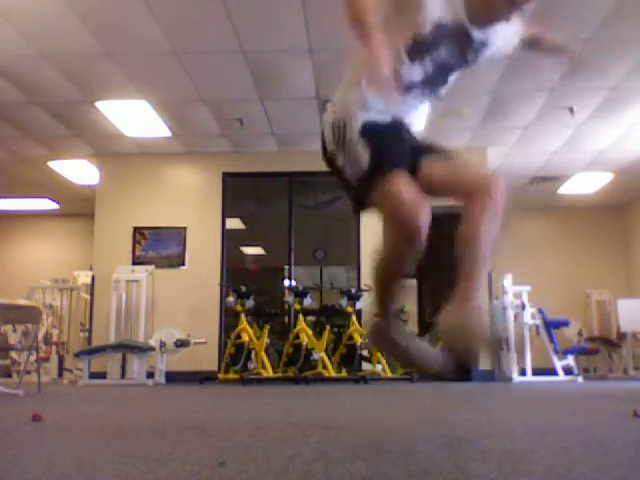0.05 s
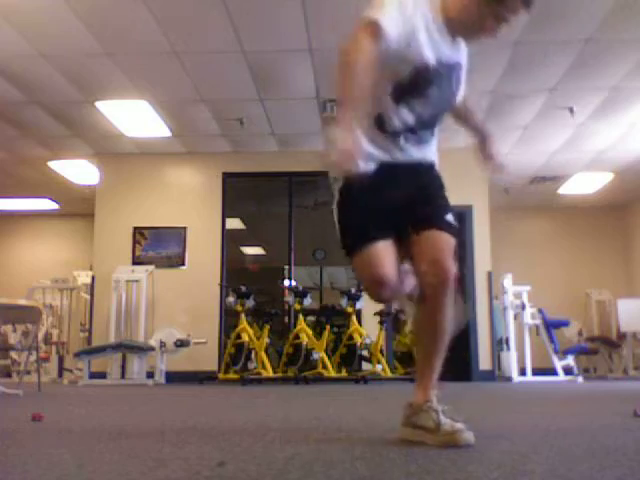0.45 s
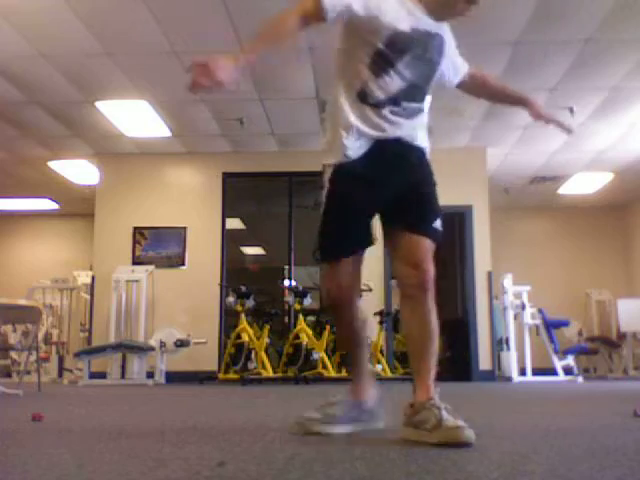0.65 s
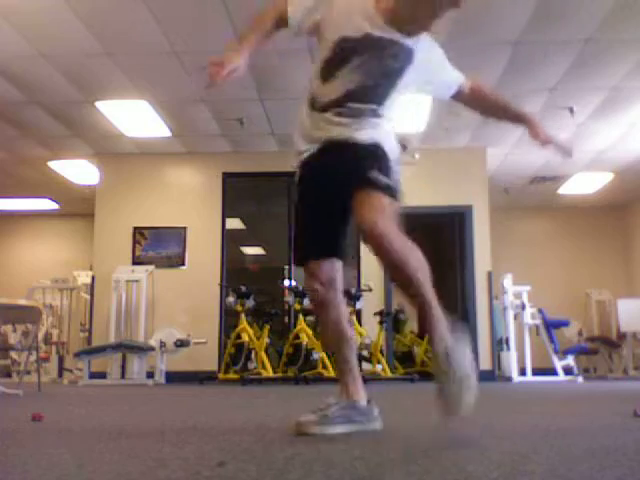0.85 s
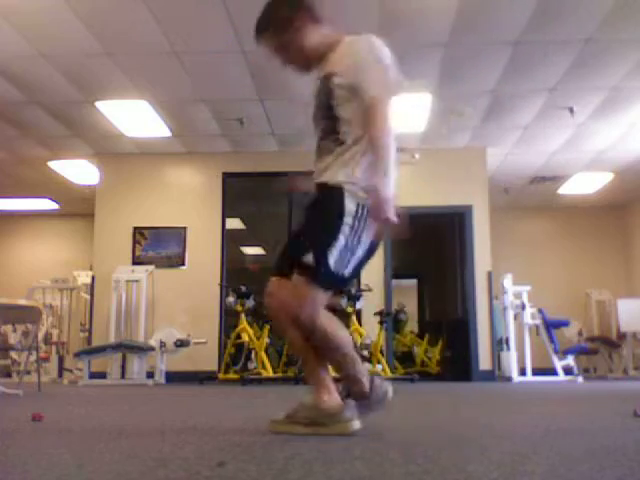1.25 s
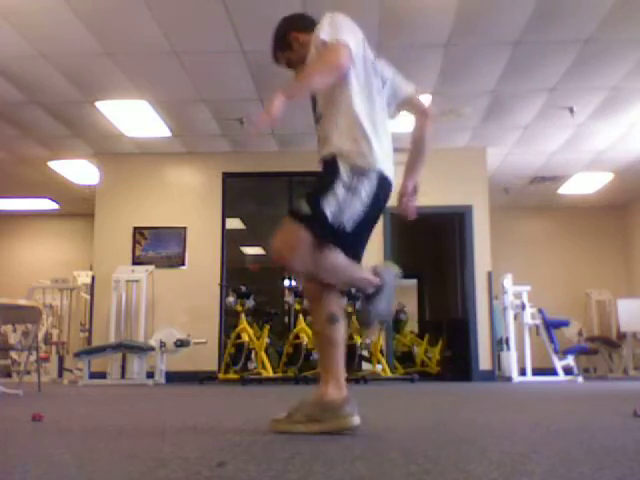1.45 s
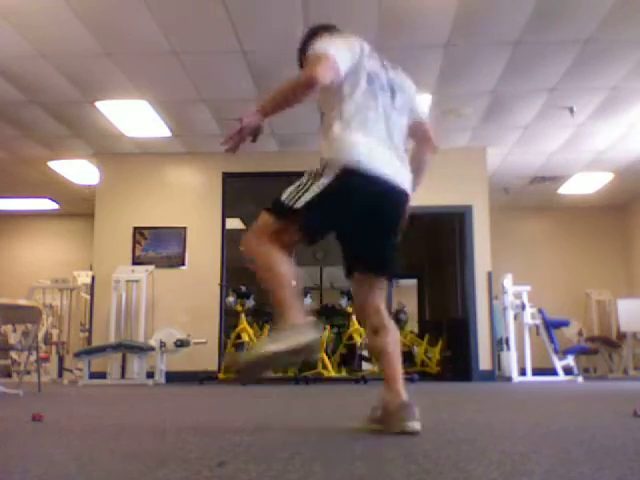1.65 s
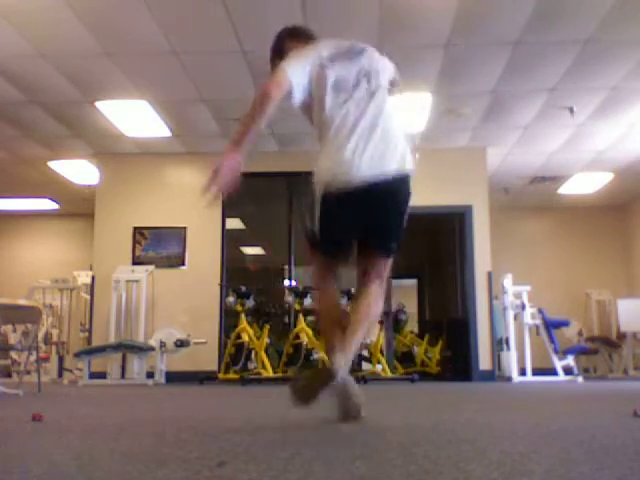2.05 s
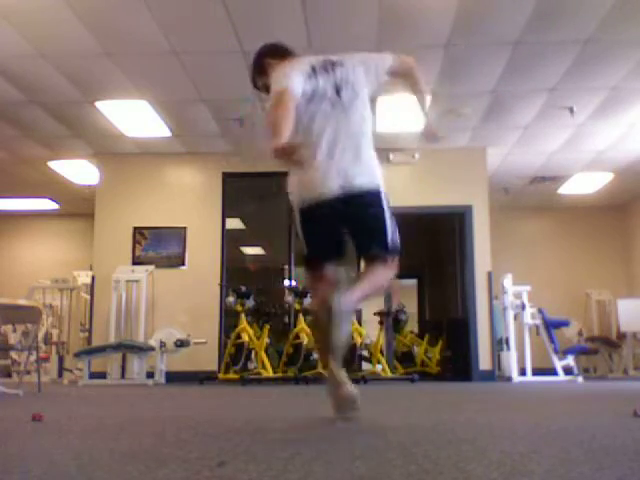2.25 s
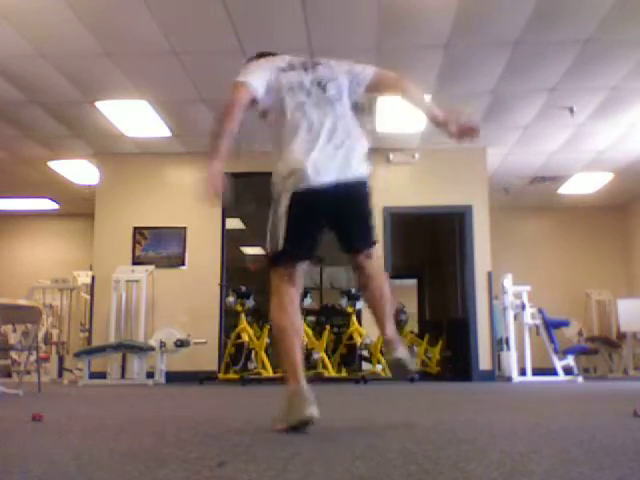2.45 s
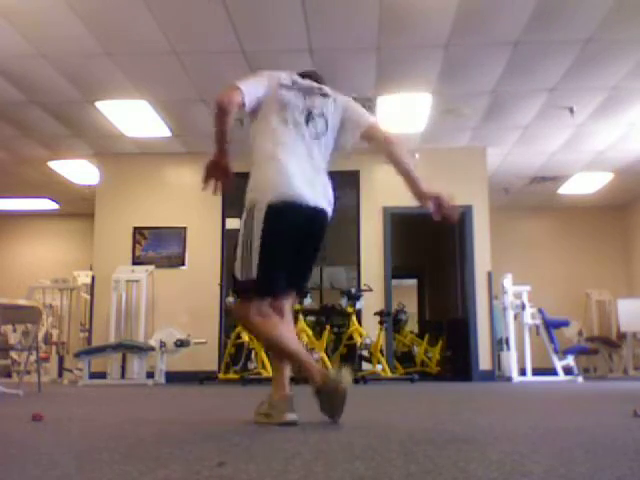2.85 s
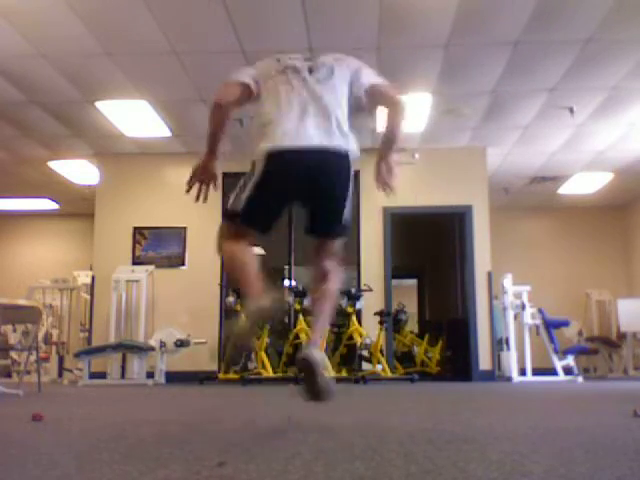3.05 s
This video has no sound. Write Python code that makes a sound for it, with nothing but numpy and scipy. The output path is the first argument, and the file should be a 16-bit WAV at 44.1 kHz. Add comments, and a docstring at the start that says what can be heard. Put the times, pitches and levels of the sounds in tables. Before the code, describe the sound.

Shoes thud on a hard gym floor. At about 0.2 seconds a jump lands with a loud, dull slap and a short room echo. A shoe touches down faintly at 1.2 seconds. Four lighter hops follow at about 1.7, 2.2, 2.5 and 2.9 seconds, the first softest, with slight scuffs. Quiet ventilation hum and a thin, high electronic whine continue throughout.

```python
"""Ventilation hums in a gym throughout, and the electronics of a camera on the ground whine thinly.
At 0.2 s someone lands a jump on the thinly covered floor: the sole slaps, the floor rings briefly,
the weight follows as a low push, and the room answers. A shoe touches down faintly at 1.2 s.
From 1.7 to 2.9 s come four lighter hops from foot to foot; now and then a shoe scuffs."""
import sys
import numpy as np
from scipy import signal
from scipy.fft import rfft, irfft
from scipy.io import wavfile
from scipy.ndimage import uniform_filter1d

SR = 44100
rng = np.random.default_rng(int(sys.argv[2]) if len(sys.argv) > 2 else 0)


def generate_wav(sig):
    """Save sig (samples, or channels by samples) to the path in sys.argv[1] as 16-bit PCM at SR."""
    pcm = np.round(np.clip(np.atleast_2d(sig).T, -1, 1) * 32767).astype(np.int16)
    wavfile.write(sys.argv[1], SR, pcm)


N = 141120  # 3.2 s


def amp(db):
    """Decibels to gain."""
    return 10 ** (np.asarray(db) / 20)


def unit(x):
    """Scales to rms 1."""
    return x / np.sqrt(np.mean(x ** 2) + 1e-20)


def curve_at(points, hz):
    """Interpolates a table on a log-frequency axis."""
    f, value = np.transpose(points)
    return np.interp(np.log(hz + 1), np.log(f), value)


def add(mix, start_s, sound):
    """Mixes a sound in at start_s."""
    part = mix[max(round(start_s * SR), 0):][:len(sound)]
    part += sound[:len(part)]


def colour(x, spectrum, size=4096):
    """Minimum-phase filter with the given spectrum."""
    log_gain = np.log(amp(curve_at(spectrum, abs(np.fft.fftfreq(size, 1 / SR)))))
    taps = np.fft.ifft(np.exp(np.conj(signal.hilbert(log_gain)))).real
    return signal.fftconvolve(x, taps[:size // 2])[:len(x)]


def drift(bandwidth_hz):
    """Low-passed random wander, rms 1."""
    hz = np.fft.rfftfreq(N, 1 / SR)
    return unit(irfft(rfft(rng.standard_normal(N)) * np.exp(-(hz / bandwidth_hz) ** 2), N))


# Air rush and hiss. Each row: frequency in Hz, relative spectral density in dB.
AIR_SPECTRUM = [(20, -49), (35, -9), (50, 2), (65, 16), (110, -2.5), (160, 1), (230, -0.5), (320, -7.5),
                (450, -12.5), (600, -15.5), (740, -12.5), (900, -16), (1080, -15.5), (1250, -18),
                (1450, -23.5), (1900, -24), (2200, -28), (4000, -30), (7000, -34.5), (9500, -35),
                (11500, -32.5), (14000, -39), (15600, -40)]
# Fan and mains tones. Each row: frequency in Hz, rms level in dB.
HUM_TONES = [(90, -55), (99.3, -60.5), (120, -51), (200.3, -65), (252, -65.5), (290, -70), (467, -76)]


def ventilation(air_db=-51, patch_db=-0.5, size=1024):
    """Rushing air, slightly patchy, with wavering fan and mains tones."""
    hz, _, noise = signal.stft(rng.standard_normal(N), SR, nperseg=size)
    patches = uniform_filter1d(rng.standard_normal(noise.shape), size=8, axis=0)
    patches = unit(uniform_filter1d(patches, size=12, axis=1))
    depth_db = patch_db / (1 + (hz / 2000) ** 2)
    gain = amp(curve_at(AIR_SPECTRUM, hz)[:, None] + depth_db[:, None] * patches)
    air = signal.istft(noise * gain, SR, nperseg=size)[1][:N]
    hum, t = np.zeros(N), np.arange(N) / SR
    for tone_hz, db in HUM_TONES:
        waver = 1 + 0.03 * drift(5.3)
        phase_rad = 2 * np.pi * (tone_hz * t + rng.random()) + 0.12 * drift(0.67)
        hum += amp(db) * waver * np.sin(phase_rad)
    return amp(air_db) * unit(air) + np.sqrt(2) * hum


# Passband of the whistle. Each row: frequency in Hz, relative gain in dB.
WHISTLE_SPECTRUM = [(9000, -21), (10500, 1.5), (11500, -2.5), (12300, 1), (13200, -6), (14000, 5),
                    (16000, -30)]


def electronic_whistle(hz=12285.3, rms_db=-63.5, stutter_hz=59.6, duty=0.37, swing_hz=327, hold=24):
    """A very high whistle from the camera; its phase stutters in regular bursts."""
    t = np.arange(N) / SR
    cycle = (t - 0.003) * stutter_hz % 1
    swing = np.sign(np.sin(2 * np.pi * swing_hz * cycle / stutter_hz))
    jitter = np.repeat(rng.standard_normal(N // hold + 1), hold)[:N]
    jump_turns = (0.13 * swing + 0.2 * jitter) * (cycle < duty)
    slip = np.minimum(cycle / duty, 1) - cycle  # phase gains in a burst, then falls back
    turns = hz * t + 0.43 * slip + jump_turns + 0.054 * drift(30)
    envelope = (1 - 0.22 * np.sin(np.pi * cycle)) * (1 + 0.04 * drift(57))
    return amp(rms_db) * unit(colour(envelope * np.sin(2 * np.pi * turns), WHISTLE_SPECTRUM))


# Steady electronic tones, below and above 10 kHz. Each row: frequency in Hz, rms level in dB.
BUZZ_TONES = [(1846, -80.5), (2729, -87), (2977, -84.5), (3225, -84.5), (3720, -89), (3967, -86.5),
              (4215, -89), (4463, -81), (4710, -88), (4947, -88), (5453, -89), (5701, -87), (5949, -84.5),
              (6444, -90)]
TOP_TONES = [(11053, -85.5), (11689, -97), (15250, -84)]


def electronic_whine(whine_hz=8000, whine_db=-59.5, dropout_hz=30, dropout_s=0.00092, first_s=0.0114):
    """The camera's whine, dropping out at a steady rate, over faint steady tones."""
    t = np.arange(N) / SR
    from_dropout_s = (((t - first_s) * dropout_hz + 0.5) % 1 - 0.5) / dropout_hz
    gate = 1 - np.exp(-(from_dropout_s / dropout_s) ** 2)
    whine = amp(whine_db) * gate * np.sin(2 * np.pi * whine_hz * t)
    buzz = sum(amp(db) * np.sin(2 * np.pi * (hz * t + rng.random()))
               for hz, db in [*BUZZ_TONES, *TOP_TONES])
    return np.sqrt(2) * (whine + buzz)


# Gym decay. Each row: frequency in Hz, T60 in seconds.
GYM_T60 = [(100, 0.24), (300, 0.56), (500, 0.51), (1000, 0.31), (2000, 0.16), (8000, 0.32)]
# Colour of the reverberation. Each row: frequency in Hz, gain in dB.
GYM_SPECTRUM = [(80, -3), (200, -5), (300, -0.5), (400, -6.5), (520, -1.5), (620, -1), (760, 4),
                (900, -3.5), (1100, 1), (1400, -5), (1900, 1.5), (8000, -8)]


def gym_reverb(x, build_s=0.01, spacing=22, size=256):
    """Diffuse tail of sparse reflections; the low mids last longest."""
    reflections = np.zeros(SR)
    slots = np.arange(0, SR - spacing, spacing)
    reflections[slots + rng.integers(0, spacing, len(slots))] = rng.choice([-1, 1], len(slots))
    hz, t, bands = signal.stft(reflections, SR, nperseg=size)
    decay = 1000 ** (-t / curve_at(GYM_T60, hz)[:, None])
    build = 1 - np.exp(-(t / build_s) ** 2)
    tail = signal.istft(bands * decay * build, SR, nperseg=size)[1]
    return signal.fftconvolve(x, colour(tail / np.linalg.norm(tail), GYM_SPECTRUM))[:N]


# Shoe scuffs. Each row: start in seconds, decay time constant in seconds, level in dB.
SHOE_SCUFFS = [(.21, 0.015, -66), (0.311, .018, -54.5), (2.178, 0.053, -61.5), (2.5, 0.022, -67),
               (2.907, 0.025, -67)]
# Friction noise. Each row: frequency in Hz, relative gain in dB.
SCUFF_SPECTRUM = [(300, -47), (1700, 13.5), (2400, -5), (3600, 0.5), (5000, 0.5), (6500, -4), (9000, -11),
                  (12000, -20), (16000, -30)]


def shoe_scuffs(rise_s=0.0027, room_db=2.5):
    """Short gritty hisses of a shoe brushing the floor."""
    envelope, t = np.zeros(N), np.arange(SR // 2) / SR
    for start_s, decay_s, db in SHOE_SCUFFS:
        add(envelope, start_s, amp(db) * np.minimum(t / rise_s, 1) * np.exp(-t / decay_s))
    grit = rng.standard_normal(N) * np.exp(0.4 * drift(400))
    direct = envelope * unit(colour(grit, SCUFF_SPECTRUM))
    return direct + amp(room_db) * gym_reverb(direct)


# Shoe ticks. Each row: start in seconds, level in dB.
SHOE_TICKS = [(0.2093, -56.5), (0.3104, -45.5), (1.21, -59)]
# Tick noise. Each row: frequency in Hz, relative gain in dB.
TICK_SPECTRUM = [(500, -7), (2000, -10), (3500, -2), (6500, -0.5), (9500, -6), (12000, -21), (16000, -17)]


def shoe_ticks(decay_s=0.0033, room_db=4):
    """Tiny bright snaps of a shoe during a footfall."""
    envelope, t = np.zeros(N), np.arange(SR // 10) / SR
    for start_s, db in SHOE_TICKS:
        add(envelope, start_s, amp(db) * np.exp(-t / decay_s))
    direct = envelope * unit(colour(rng.standard_normal(N), TICK_SPECTRUM))
    return direct + amp(room_db) * gym_reverb(direct)


# Soles rolling onto the floor. Each row: start in seconds, length in seconds, level in dB.
SOLE_ROLLS = [(0.204, 0.039, -41), (0.233, 0.058, -45), (0.295, .07, -42), (1.196, 0.13, -60),
              (2.172, 0.076, -49), (2.489, 0.039, -51), (2.86, 0.0088, -43.5), (2.896, 0.04, -47)]
# Roll noise. Each row: frequency in Hz, relative gain in dB.
ROLL_SPECTRUM = [(60, -11.5), (180, 2.5), (350, 4), (520, -6), (750, -3.5), (1080, -1.5), (1450, -14),
                 (1800, -15), (2300, -26), (16000, -46)]


def sole_rolls(room_db=-1.5):
    """A dull, grainy patter as a sole comes down."""
    envelope = np.zeros(N)
    for start_s, length_s, db in SOLE_ROLLS:
        progress = np.arange(0, 1, 1 / (length_s * SR))
        add(envelope, start_s, amp(db) * np.sin(np.pi * progress ** 0.79))
    grain = rng.standard_normal(N) * np.exp(0.35 * drift(600))
    direct = envelope * unit(colour(grain, ROLL_SPECTRUM))
    return direct + amp(room_db) * gym_reverb(direct)


def thump(hz, swell_s):
    """A heavily damped swing that swells and dies within a few cycles."""
    t = np.arange(SR // 10) / SR
    envelope = (t / swell_s * np.exp(1 - t / swell_s)) ** 2
    return -envelope * np.sin(2 * np.pi * hz * t)


# Floor modes. Each row: frequency in Hz, relative level in dB, T60 in seconds.
FLOOR_RING = [(357.6, -0.5, 0.086), (723, -8, 0.094), (1089, -2.5, 0.14)]
# Wall and ceiling echoes. Each row: delay in seconds, level in dB relative to the slap.
SLAP_ECHOES = [(.0056, -15), (.0142, -9), (.0172, -13)]
# Sole colour, applied to the whole landing. Each row: frequency in Hz, gain in dB.
SOLE_SPECTRUM = [(60, -14.5), (150, -7.5), (300, 4), (520, 6.5), (720, -0.5), (1100, 0), (1300, -1),
                 (1500, -7), (1900, -3), (2300, -19), (5000, -22), (16000, -41)]
# The jump, then four hops. Each row: start in seconds, slap level in dB, slap pitch in Hz,
# slap swell in seconds, push level in dB, ring level in dB, room send in dB; all before colouring.
FOOT_LANDINGS = [(0.2073, -15.5, 1032, 0.001, -28, -44.5, -16), (1.6899, -41.5, 537, .0010, -49, -56, -40),
                 (2.1518, -28, 716, 0.00078, -36, -40.5, -28.5),
                 (2.488, -32.5, 620, 0.00077, -30.5, -49, -40),
                 (2.8477, -28, 740, 0.00069, -33, -39.5, -34.5)]


def landings(push_hz=182, push_swell_s=0.007, push_lag_s=0.00082, push_room_db=-7):
    """The sole slaps, the floor rings briefly, the body's weight pushes after it, the room answers."""
    out, t = np.zeros(N), np.arange(SR // 5) / SR
    ring = sum(amp(db) * 1000 ** (-t / t60_s) * np.sin(2 * np.pi * hz * t)
               for hz, db, t60_s in FLOOR_RING)
    for start_s, slap_db, slap_hz, swell_s, push_db, ring_db, room_db in FOOT_LANDINGS:
        slap = amp(slap_db) * thump(slap_hz, swell_s)
        push = amp(push_db) * thump(push_hz, push_swell_s)
        add(out, start_s, slap)
        add(out, start_s, -amp(ring_db) * ring)
        add(out, start_s + push_lag_s, push)
        for delay_s, echo_db in SLAP_ECHOES:
            add(out, start_s + delay_s, amp(echo_db) * slap)
        # The slap radiated into the room is broader in band than the one along the floor.
        send = np.zeros(N)
        add(send, start_s, amp(room_db) * thump(slap_hz, swell_s=0.00046))
        add(send, start_s + push_lag_s, amp(push_room_db) * push)
        out += gym_reverb(send)
    return colour(out, SOLE_SPECTRUM)


def scene(right_lag_s=11.5e-6):
    """One microphone feeds both channels, the right slightly late."""
    feet = landings() + sole_rolls() + shoe_ticks() + shoe_scuffs()
    background = ventilation() + electronic_whistle() + electronic_whine()
    mono = feet + background
    delay = np.exp(-2j * np.pi * np.fft.rfftfreq(N, 1 / SR) * right_lag_s)
    return np.array([mono, irfft(rfft(mono) * delay, N)])


def record(dry, low_cut_hz=53, high_cut_hz=15720):
    """Low cut and steep band limit."""
    highpass = signal.butter(3, low_cut_hz, "high", fs=SR, output="sos")
    lowpass = signal.firwin(1023, high_cut_hz, window=("kaiser", 9), fs=SR)
    return signal.oaconvolve(signal.sosfilt(highpass, dry), lowpass[None], "same")


dry = scene()
out = record(dry)
generate_wav(out)
```